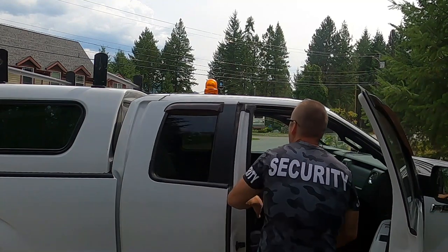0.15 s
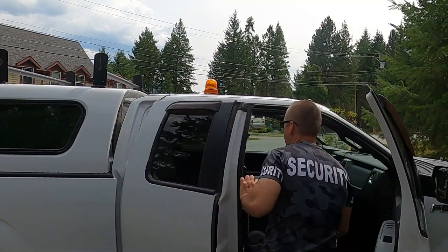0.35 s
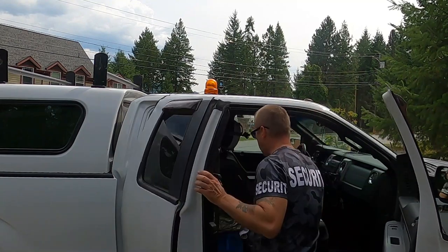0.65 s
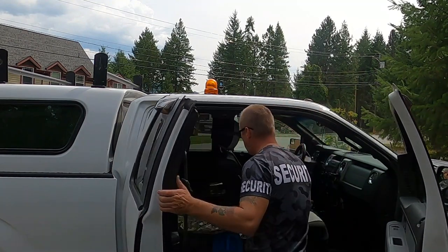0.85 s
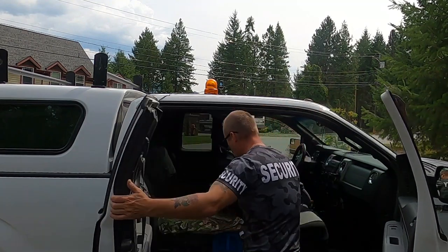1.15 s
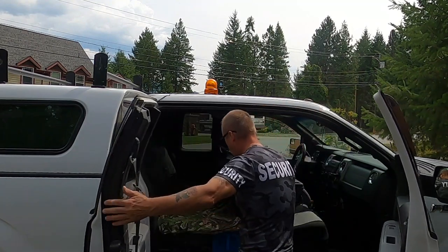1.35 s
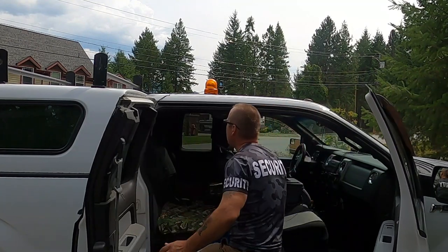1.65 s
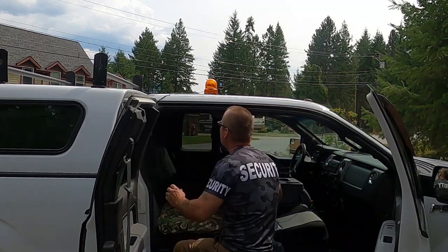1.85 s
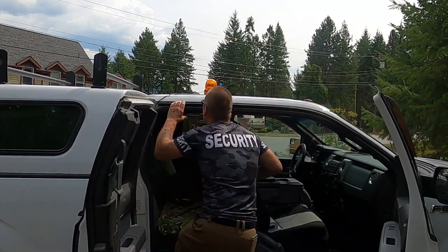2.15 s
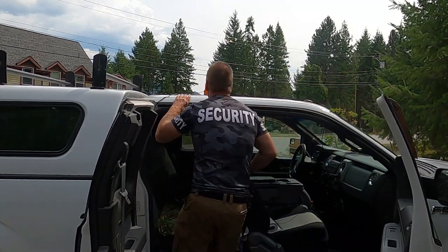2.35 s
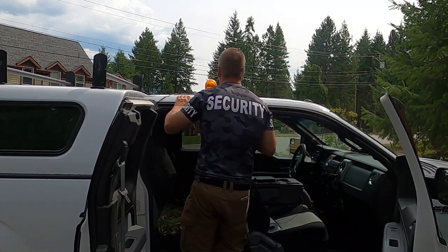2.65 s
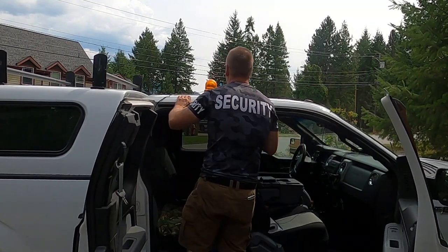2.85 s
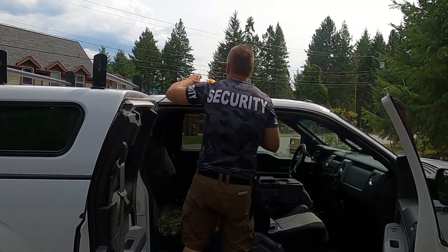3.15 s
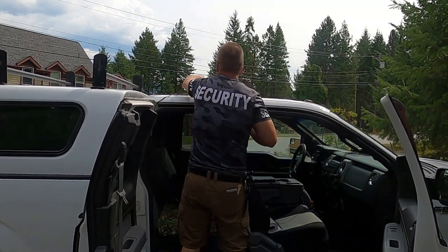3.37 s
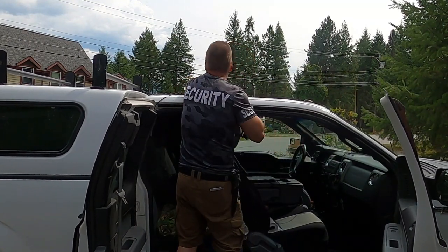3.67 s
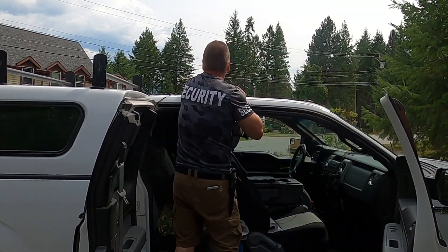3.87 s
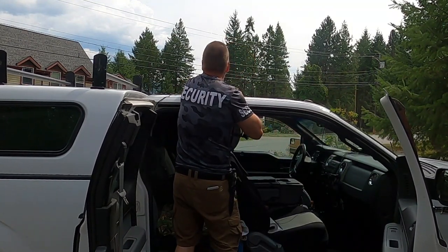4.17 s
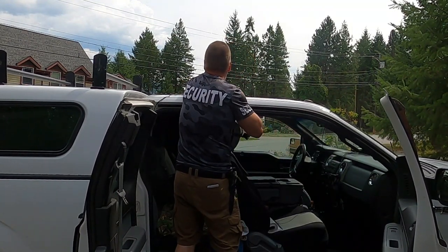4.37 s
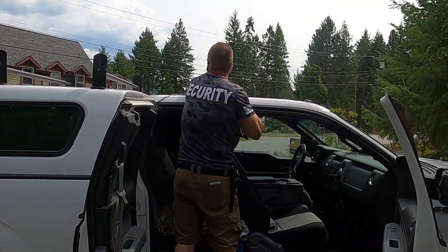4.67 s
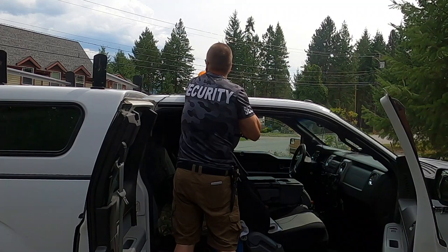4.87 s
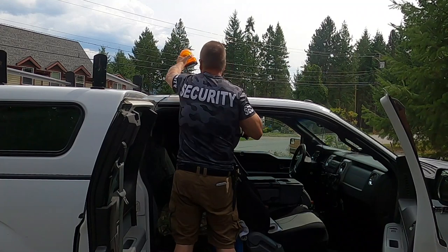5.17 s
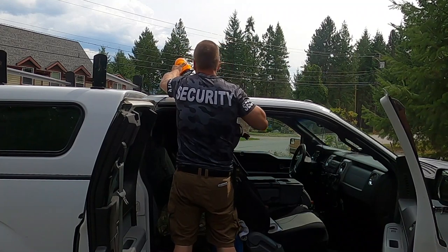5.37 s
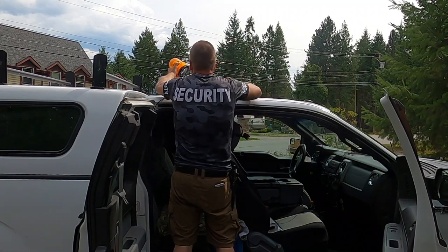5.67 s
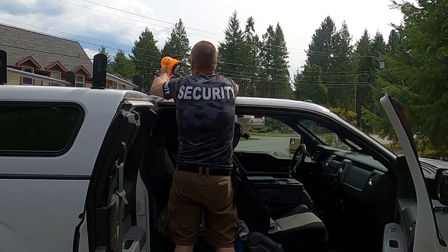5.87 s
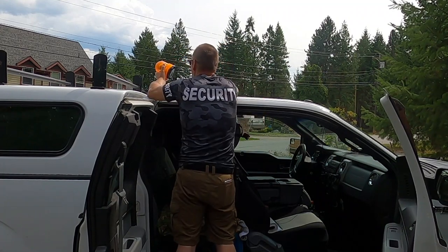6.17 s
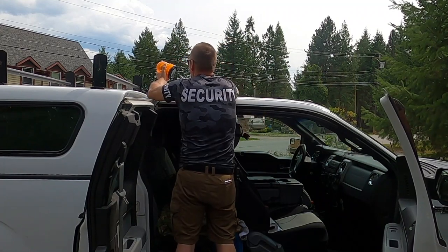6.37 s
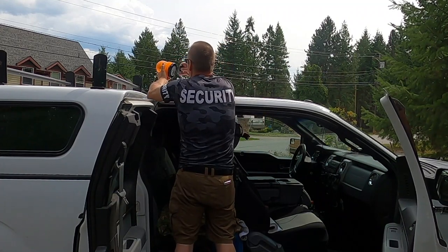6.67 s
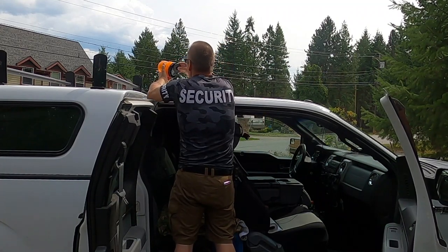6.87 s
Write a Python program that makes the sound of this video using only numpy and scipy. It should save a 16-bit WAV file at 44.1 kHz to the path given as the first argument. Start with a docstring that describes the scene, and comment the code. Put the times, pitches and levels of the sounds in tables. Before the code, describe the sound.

A stereo microphone near a truck in open air, without reverberation, hears low engine drone throughout. First a dull panel thump and crisp latch clunk, clothing swishes and small ticks; next a hard clack and soft bumps underfoot. Later, quick bright clacks and hollow roof bangs with gritty scraping and one thin ping as the magnet lets go. Finally only tiny ticks over a stronger fan hum.

```python
"""An idling pickup engine and a faint outdoor hiss are heard first, as sums of steady tones and shaped noise.
Beside it a man unlatches and swings open the rear door, then climbs on the sill with a sharp clack.
He rocks a magnetic beacon off the roof: its base knocks on the sheet steel, which booms underneath.
Each blow excites decaying noise bands and sine modes; clothes and grit are noise, small fittings tick.
The place is open air, without room reverberation."""
import sys
import numpy as np
from scipy import signal
from scipy.fft import rfft, irfft, next_fast_len
from scipy.io import wavfile

SR = 44100
rng = np.random.default_rng(int(sys.argv[2]) if len(sys.argv) > 2 else 0)


def write(x):
    x = np.atleast_2d(x).T
    wavfile.write(sys.argv[1], SR, np.round(np.clip(x, -1, 1) * 32767).astype(np.int16))


N = 309582
TIME = np.arange(N) / SR
RING = TIME[:int(.7 * SR)]  # time axis of one blow [s]
BANDS = 25 * 2 ** np.arange(0, 9.3, .5)  # half-octave centres [Hz]
TOP_HZ = 15600

# outdoor air and engine wash: (frequency [Hz], relative level per half octave [dB])
AIR_SPECTRUM = [(25, -67), (50, -65), (130, -59.5), (200, -66), (300, -70), (500, -72), (750, -77.5),
                (1150, -69.5), (2300, -73), (4000, -84), (6500, -89), (10000, -106), (15000, -114)]
# the wash comes mostly from the left: (frequency [Hz], left minus right [dB])
AIR_BALANCE = [(200, 0), (500, 2), (1000, 4), (2400, 7.5), (3400, 7), (5000, 4), (9000, 2)]
# the wash sinks slowly, and gains a little as the cooling fan grows louder
AIR_DB, AIR_FADE_DB_PER_S, FAN_WASH_DB = 5, .6, 2.2

# firing rate: the idle holds, then a belt load comes on and the speed settles a little higher
IDLE_HZ, FAST_IDLE_HZ, LOAD_S, SETTLE_S = 48.02, 52.7, 1.35, 1.05
# engine tones: (multiple of the firing rate [1], level until the load [dB], fade under load [dB/s])
ENGINE_TONES = [(.5, -58.5, -0.5), (1, -38, 2.5), (1.5, -46, 4), (2, -58, 1.5), (2.5, -49.5, -0.1),
                (3, -59.5, -1.2), (3.5, -62.5, 2), (4, -71.5, -1), (4.5, -75.5, 1.5), (5, -62, 3.5),
                (5.5, -66.5, .5), (7, -70, 0.7), (9.5, -72.5, 0.5)]
# the tone at 2.5 times the firing rate booms while the engine takes up the load
LABOUR_DB, LABOUR_RISE_S, LABOUR_FALL_S = 9, 0.039, 0.97
# the belt tone comes in with the load and eases off; its ratio is to the firing rate
BELT_RATIO, BELT_DB, BELT_RISE_S, BELT_FADE_DB_PER_S = 1.727, -44.5, 0.22, 0.93
# the cooling fan grows louder at a constant pitch
FAN_HZ, FAN_DB, FAN_SLOW_DB, FAN_ON_S, FAN_RISE_S = 152.5, -45, -60.5, 5.12, 0.98

# rubbing cloth: (frequency [Hz], relative level per half octave [dB])
CLOTH_SPECTRUM = [(30, -33), (600, -10), (2000, 1), (4500, -3), (7500, -8), (11000, -18), (15000, -26)]
# moves of the body: (start [s], length [s], relative level [dB])
MOVES = [(.5, .8, -78.5), (0.79, 0.13, -72), (1.388, .42, -69), (1.9, .35, -76), (2.17, .3, -66),
         (2.68, 0.58, -73), (3.35, .6, -79), (4.935, 0.68, -77.5), (6.28, 0.058, -74), (6.66, 0.11, -77)]
CLOTH_ATTACK_S, CLOTH_RELEASE_S, CLOTH_REST_DB = 0.065, .07, -97

# ticks of hinges, buckles and plastic:
# (time [s], relative level [dB], centre [Hz], spread [octaves], t60 [s])
TICKS = [(0.306, -51.5, 2020, .6, 0.027), (.745, -56.5, 4970, .45, .03), (0.884, -36.5, 2320, 1.15, 0.013),
         (.893, -43.5, 2450, .7, .049), (1.007, -54, 2630, .3, 0.056), (1.547, -56, 5600, 1.2, 0.029),
         (1.858, -44, 3420, 0.61, 0.062), (2.004, -52, 2920, 1.1, 0.067), (2.489, -52, 3830, 1.04, 0.093),
         (2.978, -52.5, 1580, .4, 0.091), (3.152, -46.5, 1500, 0.72, 0.04), (3.373, -59, 3950, 1.05, 0.058),
         (3.703, -53.5, 5000, 1.1, .093), (4.965, -40, 1320, .55, .033), (4.9665, -53.5, 3600, .9, .014),
         (5.362, -51.5, 2970, 1, 0.1), (6.335, -43.5, 6900, .85, 0.062), (6.344, -49.5, 3000, 2.1, 0.082),
         (6.735, -47, 2580, 0.3, 0.026), (6.898, -60.5, 5500, 0.9, .023), (6.926, -62.5, 8450, .4, .068),
         (7.01, -58.5, 4300, 0.93, 0.042)]
# soles, latch and the beacon's base dragging over grit: (start [s], length [s], rms level [dB], centre [Hz])
SCRAPES = [(0.354, 0.03, -51, 2080), (2.676, 0.032, -60, 2570), (2.742, 0.03, -55, 1830),
           (4.995, 0.06, -50, 1770), (5.074, 0.033, -50, 2400), (5.413, 0.11, -61, 2300)]

# dense ringing of each body: (frequency [Hz], relative level per half octave [dB], t60 before scaling [s])
DOOR_BODY = [(39.85, -15, 0.14), (110, -17.5, 0.4), (244.6, -17, 0.18), (500, -9, 0.072), (850, -20, 0.16),
             (1300, -13, 0.095), (1790, -24.5, 0.098), (3000, -15, 0.05), (4500, -22.5, 0.05),
             (7850, -37, 0.05), (14000, -57, 0.044)]
ROOF_BODY = [(40, -21.5, 0.93), (130, -13, 0.58), (320, -12, 0.44), (600, -10, 0.26), (1070, -10, 0.2),
             (2160, -16.5, 0.24), (3120, -13.5, 0.11), (4500, -24, 0.15), (7700, -40.5, 0.21),
             (14000, -55, 0.14)]
FITTING_BODY = [(60, -25, 0.093), (250, -19, 0.087), (500, -19.5, 0.15), (900, -10, 0.094),
                (1800, -6, 0.13), (2900, -13.5, 0.18), (4180, -7.5, 0.12), (7500, -11, .07),
                (10000, -25, 0.1), (14500, -36.5, .08)]
# modes that stand out: (frequency [Hz], relative level [dB], t60 before scaling [s])
DOOR_MODES = [(97.8, 1.5, .25), (119, 1.5, 0.33), (152.7, -4.5, 0.38), (228, -3.5, 0.18), (260, -9.5, .45),
              (306.5, -9, 0.25), (398, -5, 0.086), (665, -13, 0.14), (713.4, -4.5, 0.12), (764, 0.5, 0.11),
              (1013, -11, 0.12), (1110, -2, 0.058), (1267, -2, 0.056), (1487, -5.5, 0.076),
              (1545, -2.5, 0.094), (2850, -14.5, 0.075)]
ROOF_MODES = [(56.5, 9.5, 0.66), (128.5, 5.5, 0.31), (165, -12, 0.63), (199.5, -4.5, 0.53),
              (245, -10.5, 0.18), (296, -4, 0.2), (309.4, 2.5, 0.28), (359.7, -1, 0.2), (408.6, -3, 0.24),
              (477, 0.5, 0.3), (517, -7, 0.42), (581, -21, 0.22), (656, -10, .25), (768, -2.5, 0.27),
              (814, -5, 0.13), (889, -2, 0.2), (1027, -11.5, 0.25), (1080, 0.5, 0.21), (1170, 0, 0.24),
              (1335, -3, 0.09), (1507, -12, 0.15), (1560, -32, 0.12), (1863, -19.5, 0.47),
              (2020, -19, 0.14), (2190, -11, 0.19), (2643, -5, 0.1)]
FITTING_MODES = [(340, -18.5, 0.027), (500, -12.5, 0.11), (590, -14.5, .09), (744, -5.5, 0.06),
                 (912, -2, .09), (1156, 1, .1), (1290, -7.5, 0.067), (1428, 2, 0.11), (1526, -4, 0.049),
                 (1740, -1.5, .08), (1900, -0.5, .08), (2056, -5.5, 0.055), (2165, -3, .08), (2314, 0, .09),
                 (3280, -9.5, 0.14), (3730, -17, .08), (4006, -8.5, .07), (4730, -12, .08),
                 (5451, -8.5, 0.053), (5610, -13, .07), (7580, -12.5, .06), (7782, -10, 0.082)]
# modes of the magnet cup: (frequency [Hz], relative level [dB], t60 [s])
PING_MODES = [(9380, 2, 0.18), (9600, -8.5, 0.1), (13290, -28, .22), (14620, -21, 0.14)]

# blows: (time [s], relative level [dB], bass [dB], treble [dB], ring length factor [1])
# door, latch and feet on the sill, same columns
DOOR_BLOWS = [(.001, -27, 5.5, -12.5, 1.11), (.353, -37, -15, -13, 1), (.364, -35, -5, -13, 1.2),
              (.395, -18.5, -2, 0.5, 0.58), (.4155, -29, 8.5, 7, 1.11), (.739, -42.5, 9.5, 4, 0.47),
              (1.675, -40.5, 8, -7, 0.95), (2.638, -43.5, -22, -11, 0.72), (2.686, -41, -18, -3, 1.3),
              (2.741, -32.5, -16, -10.5, 1.27), (2.756, -44, 10, -1, 0.75), (2.98, -52.5, 11, 10, 1.3),
              (3.152, -44.5, -26.5, -11, 0.88)]
# beacon base on the roof, same columns
ROOF_BLOWS = [(5.011, -34.5, 4, 8.5, 1.2), (5.036, -29, -4, -1, 0.46), (5.079, -36, 12, 1, 1.37),
              (5.1, -45, 10, -5, 1.1), (5.202, -21, -17, -13.5, 0.97), (5.224, -28, 5, -14.5, 0.37),
              (5.3, -53.5, 19, -5, 2.5), (5.378, -40, -6.5, -13, 2.4), (5.403, -25, -4.5, 3, 1.1),
              (5.443, -27, -10.5, 10.5, 1.46), (5.479, -21, 3, 16.5, 0.46), (5.4975, -21.5, 1, -4.5, 0.78),
              (6.14, -60, 30, -15, 0.55)]
# hard fittings that clack under load and where the beacon's base touches down, same columns
FITTING_BLOWS = [(2.273, -21, -1, -17, 0.56), (2.2795, -18, -9, 0.5, 0.78), (2.289, -34, 16, 6, 1.35),
                 (2.329, -40, -2, 10, 1.4), (2.367, -36, 4, 9.5, 0.51), (2.374, -52, -10, 19, 1.2),
                 (5.0365, -18, -5, -22.5, 0.2), (5.202, -48, 10, 10, 0.96), (5.479, -35.5, 8, 9, 0.83)]
# the single ping of the magnet cup: (time [s], relative level [dB])
PING = (5.036, -41.5)


def undb(db):
    """A level in decibels is twenty times the decimal logarithm of the gain returned."""
    return 10 ** (np.asarray(db) / 20)


def at_bands(table):
    """Spectrum columns are interpolated at the band centres on a logarithmic frequency scale."""
    hz, *columns = np.transpose(table)
    return [np.interp(np.log(BANDS), np.log(hz), column) for column in columns]


def walk(rate):
    """Random drift joins normal values, rate per second, by straight lines; its rms is about 1.27."""
    points = rng.standard_normal(int(N / SR * rate) + 2)
    return 1.55 * np.interp(TIME * rate, np.arange(len(points)), points)


def since(s):
    """Elapsed time in seconds is zero until the given moment."""
    return np.maximum(TIME - s, 0)


def rise(s, attack_s):
    """A linear onset grows from 0 to 1, starting at the given moment."""
    return np.minimum(since(s) / max(attack_s, .001), 1)


def fade(t60):
    """Damping makes a ring decay exponentially, by 60 dB in t60 seconds."""
    return np.exp(-np.log(1000) * RING / max(t60, .002))


def swell(hz, cycles):
    """A resonance needs some cycles to build up, so low frequencies come late."""
    return 1 - np.exp(-(RING * hz / cycles) ** 2)


def colour(hz, bass_db, treble_db):
    """Contact sets the spectrum: a heavy push feeds the bass, a hard contact the treble."""
    bass = bass_db / (1 + (hz / 310) ** 3)
    treble = treble_db / (1 + (3000 / hz) ** 2)
    return undb(bass + treble)


def sides(hz, pan_db):
    """Diffraction: the microphone's body shades mainly the shorter waves, giving left and right gains."""
    return undb(np.array([[.5], [-.5]]) * pan_db * hz / (hz + 1500))


def add(out, s, sound):
    """Superposition: a sound is summed into the mix from the given time."""
    start = max(int(s * SR), 0)
    part = sound[..., :max(N - start, 0)]
    out[:, start:start + part.shape[-1]] += part


def band_noise(apart_hz):
    """Half-octave noises of rms 1 lose their correlation between the channels towards the treble."""
    size = next_fast_len(N)
    hz = np.arange(size // 2 + 1) * SR / size + 1  # offset avoids log of zero
    mid, side = rfft(rng.standard_normal((2, size)))
    width = np.sqrt(hz / (hz + apart_hz)) * hz / (hz + 150)
    pair = mid + width * side * np.array([[1], [-1]])
    bank = []
    for centre in BANDS:
        distance = np.minimum(2 * np.abs(np.log2(hz / centre)), 1)
        band = irfft(pair * np.cos(np.pi / 2 * distance), size)[:, :N]
        bank.append((band / band.std()).astype(np.float32))
    return np.array(bank)


def air(bank):
    """Broadband outdoor wash is a sum of noise bands, each wavering in level and weighted to one side."""
    band_db, = at_bands(AIR_SPECTRUM)
    balance_db, = at_bands(AIR_BALANCE)
    wash = np.zeros((2, N))
    for db, left_db, noise in zip(band_db, balance_db, bank):
        balance = undb(np.array([[.5], [-.5]]) * left_db)
        wash += undb(db + 0.36 * walk(10)) * noise * balance
    fan_wash_db = FAN_WASH_DB * rise(FAN_ON_S, FAN_RISE_S)
    return undb(AIR_DB - AIR_FADE_DB_PER_S * TIME + fan_wash_db) * wash


def tone(turns, db, waver_db):
    """A sinusoid follows the phase in turns; its rms level drifts around db."""
    wave = np.sin(2 * np.pi * (turns + rng.random()))
    return np.sqrt(2) * undb(db + waver_db * walk(11)) * wave


def fan():
    """Blade passing gives a fundamental and its octave, which grow louder together."""
    blades = FAN_HZ * TIME
    db = FAN_SLOW_DB + (FAN_DB - FAN_SLOW_DB) * rise(FAN_ON_S, FAN_RISE_S)
    return tone(blades, db, waver_db=1.8) + tone(2 * blades, db - 18, waver_db=1)


def engine_and_belt():
    """Periodic firing gives harmonics and uneven firing half orders; the belt tone follows the same speed."""
    loaded = since(LOAD_S)
    hz = FAST_IDLE_HZ + (IDLE_HZ - FAST_IDLE_HZ) * np.exp(-loaded / SETTLE_S)
    firings = np.cumsum(hz * (1 + 0.0017 * walk(15))) / SR
    labour_db = LABOUR_DB * rise(LOAD_S - LABOUR_RISE_S, LABOUR_RISE_S) * np.exp(-loaded / LABOUR_FALL_S)
    out = np.zeros(N)
    for order, db, fade_db in ENGINE_TONES:
        boom_db = labour_db if order == 2.5 else 0
        out += tone(firings * order, db - fade_db * loaded + boom_db, waver_db=1.23)
    belt = tone(firings * BELT_RATIO, BELT_DB - BELT_FADE_DB_PER_S * loaded, waver_db=1.9)
    return out + rise(LOAD_S, BELT_RISE_S) * belt


def clothes(bank):
    """Friction of cloth gives shaped noise in uneven little strokes with each move."""
    band_db, = at_bands(CLOTH_SPECTRUM)
    # the channels are swapped
    cloth = np.tensordot(undb(band_db).astype(np.float32), bank, 1)[:, ::-1]
    rubbing = undb(CLOTH_REST_DB) + np.zeros(N)
    for s, length, db in MOVES:
        release = np.exp(-since(s + length) / CLOTH_RELEASE_S)
        rubbing += undb(db) * rise(s, CLOTH_ATTACK_S) * release
    strokes = undb(1.5 * walk(30) + 1.2 * walk(400))
    return rubbing * strokes * cloth


def ticks(bank):
    """An impulse makes each small part ring briefly in its own band, with a faint mode at the centre."""
    out = np.zeros((2, N))
    for s, db, hz, spread, t60 in TICKS:
        start = int(rng.random() * (N - len(RING)))
        weights = np.exp(-(np.log2(BANDS / hz) / spread) ** 2)
        weights /= np.linalg.norm(weights)
        noise = np.tensordot(weights, bank[:, :, start:start + len(RING)], 1)
        mode = undb(-21) * np.sin(2 * np.pi * hz * RING)
        decay = fade(t60) + undb(-3) * fade(0.0053)  # ring and snap
        envelope = undb(db) * swell(hz, cycles=0.79) * decay
        add(out, s, envelope * (noise + mode) * sides(hz, pan_db=-1))
    return out


def scrapes(grains_per_s, spread_db):
    """Stick-slip friction is a run of uneven tiny slips, each one a click in a broad resonance."""
    out = np.zeros((2, N))
    for s, length, db, hz in SCRAPES:
        slips = rng.random(len(RING)) < grains_per_s / SR
        signs = rng.choice([-1, 1], len(RING))
        sizes = undb(spread_db * rng.standard_normal(len(RING))) * signs
        band = signal.butter(4, [hz / 2, min(hz * 1.7, SR / 3)], "band", fs=SR, output="sos")
        grit = signal.sosfilt(band, slips * sizes * (RING < length))
        rms = np.sqrt(np.sum(grit ** 2) / (length * SR) + np.finfo(float).eps)
        add(out, s, undb(db) * grit / rms)
    return out


def struck(blows, body, modes, bank, modes_db, crack_db, crack_s, tail_db, tail_s, cycles, pan_db):
    """Modal response: each blow excites a brief crack, dense ring, strong modes and faint tail from the cab."""
    out = np.zeros((2, N))
    body_db, body_t60 = at_bands(body)
    crack_and_tail = undb(crack_db) * fade(crack_s) + undb(tail_db) * fade(tail_s)
    # one body always rings with the same dense pattern of modes
    start = rng.integers(N - len(RING))
    dense = []
    for hz, noise in zip(BANDS, bank):
        dense.append(noise[:, start:start + len(RING)] * swell(hz, cycles) * sides(hz, pan_db))
    # successive strong modes in the table swing in opposite directions
    strong = []
    for k, (hz, _, _) in enumerate(modes):
        wave = (-1) ** k * np.sin(2 * np.pi * hz * RING)
        strong.append(wave * swell(hz, cycles) * sides(hz, pan_db))
    for s, db, bass_db, treble_db, ring in blows:
        sound = np.zeros((2, len(RING)))
        for hz, band_db, t60, wave in zip(BANDS, body_db, body_t60, dense):
            gain = undb(band_db) * colour(hz, bass_db, treble_db)
            sound += gain * (fade(t60 * ring) + crack_and_tail) * wave
        for (hz, mode_db, t60), wave in zip(modes, strong):
            gain = undb(modes_db + mode_db) * colour(hz, bass_db, treble_db)
            sound += gain * fade(t60 * ring) * wave
        add(out, s, undb(db) * sound)
    return out


def fittings(bank):
    """Stiff small parts resonate mostly in the treble and need several cycles to build up."""
    return struck(FITTING_BLOWS, FITTING_BODY, FITTING_MODES, bank, modes_db=-6.5, crack_db=-8.5,
                  crack_s=.012, tail_db=-44, tail_s=0.32, cycles=3, pan_db=-1.5)


def door(bank):
    """A damped panel answers latch, swing and feet on the sill with a strong crack and short ring."""
    return struck(DOOR_BLOWS, DOOR_BODY, DOOR_MODES, bank, modes_db=-9, crack_db=7.5,
                  crack_s=0.0035, tail_db=-27.5, tail_s=.5, cycles=0.52, pan_db=-1)


def ping():
    """Free vibration of the steel cup round the magnet gives a thin ring of high modes."""
    out = np.zeros((2, N))
    s, level_db = PING
    for hz, db, t60 in PING_MODES:
        add(out, s, undb(level_db + db) * fade(t60) * np.sin(2 * np.pi * hz * RING))
    return out


def roof(bank):
    """Plate vibration: the sheet steel booms in long low modes under the knocks of the beacon."""
    return struck(ROOF_BLOWS, ROOF_BODY, ROOF_MODES, bank, modes_db=-9, crack_db=-16,
                  crack_s=0.0034, tail_db=-21.5, tail_s=0.55, cycles=0.86, pan_db=-1)


def scene():
    """Superposition of engine and air with the door, the fittings and the beacon."""
    near = band_noise(apart_hz=16000)
    background = air(band_noise(apart_hz=900)) + fan() + engine_and_belt()
    handling = clothes(near) + ticks(near) + scrapes(grains_per_s=1300, spread_db=1.5)
    return background + handling + fittings(near) + door(near) + ping() + roof(near)


def record(dry):
    """Path delay and shading make the left port late and duller; the microphone cuts deep bass and top."""
    lag_s, low_cut_hz, shade_db, shade_hz = 2e-5, 30, -2.5, 5000
    size = next_fast_len(N + len(RING))
    hz = np.arange(size // 2 + 1) * SR / size
    # half of the shading dulls the left, the other half brightens the right
    shade = undb(shade_db / 2 * hz ** 2 / (hz ** 2 + shade_hz ** 2))
    response = np.array([shade * np.exp(-2j * np.pi * hz * lag_s), 1 / shade])
    ports = irfft(rfft(dry, size) * response, size)[:, :N]
    ports = signal.sosfilt(signal.butter(2, low_cut_hz, "high", fs=SR, output="sos"), ports)
    return signal.sosfilt(signal.ellip(8, .2, 70, TOP_HZ, fs=SR, output="sos"), ports)


dry = scene()
out = record(dry)
write(out)
```